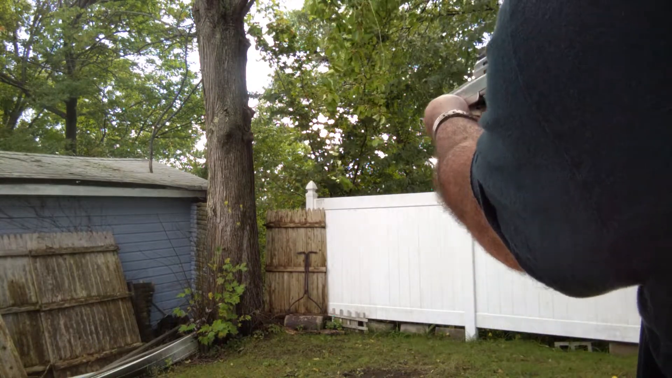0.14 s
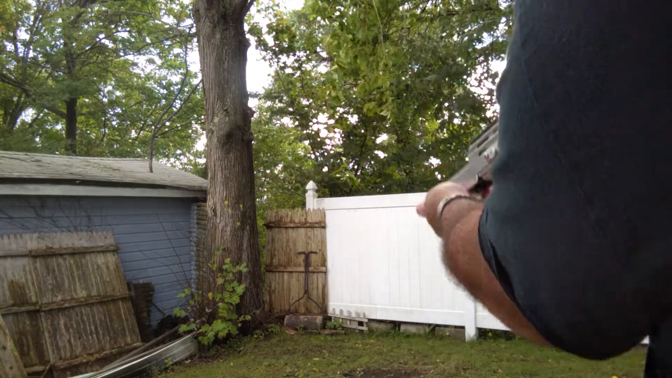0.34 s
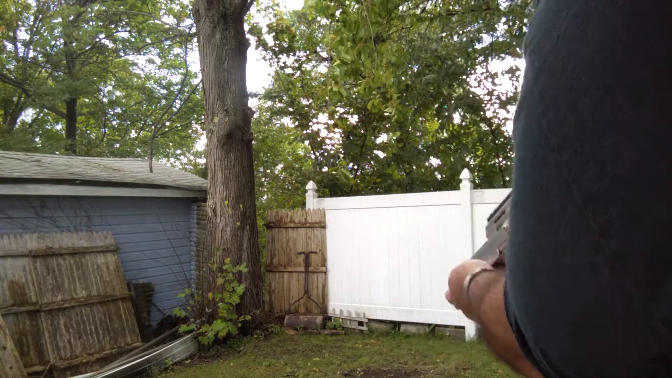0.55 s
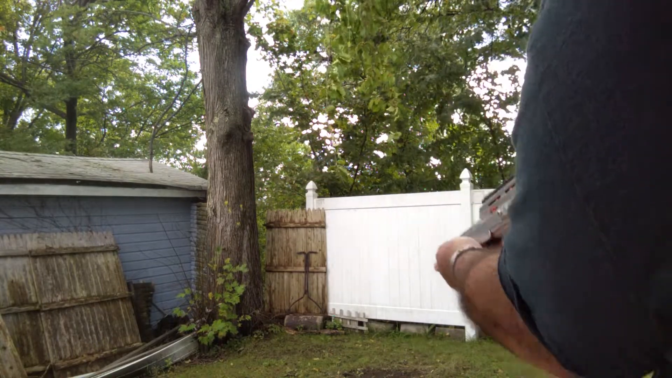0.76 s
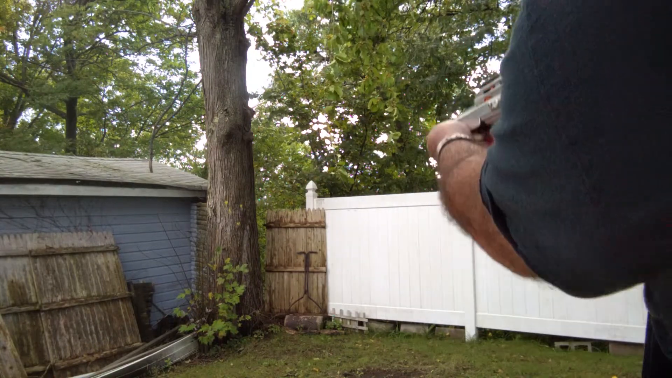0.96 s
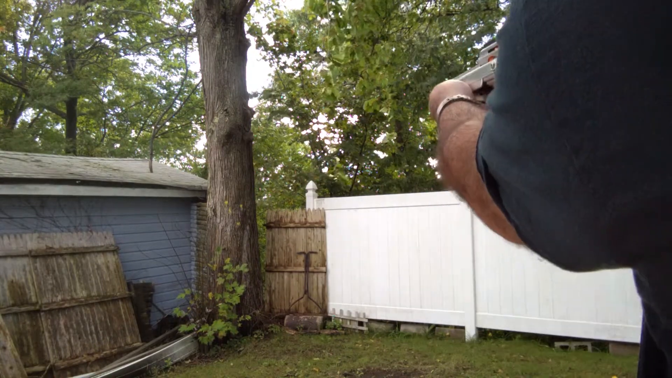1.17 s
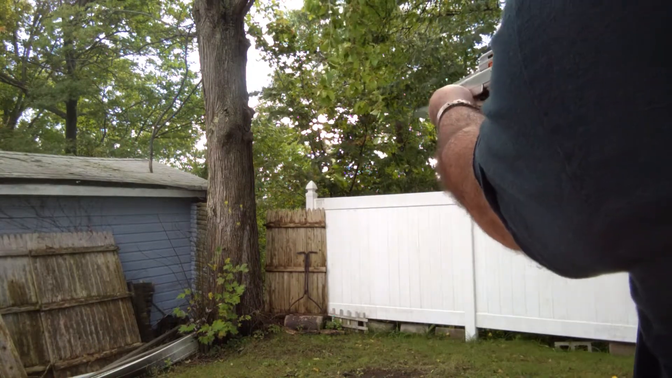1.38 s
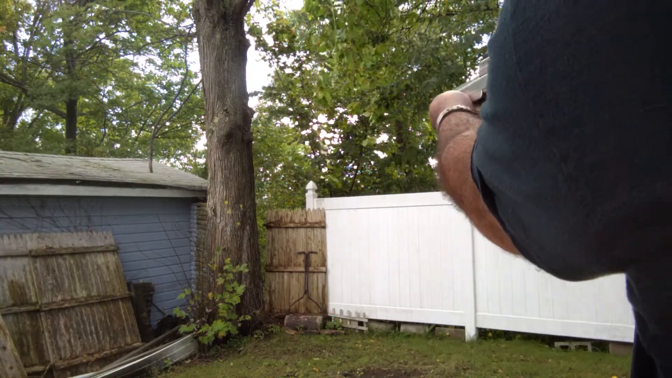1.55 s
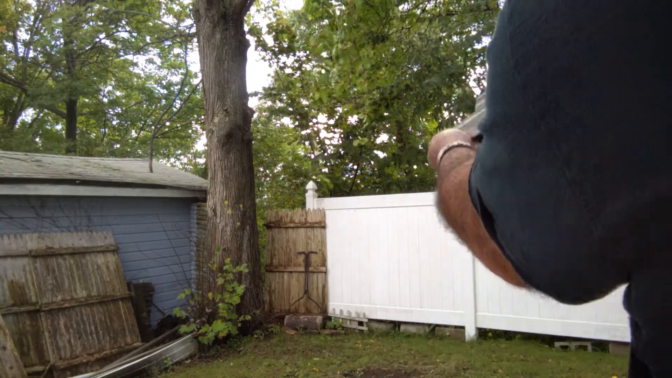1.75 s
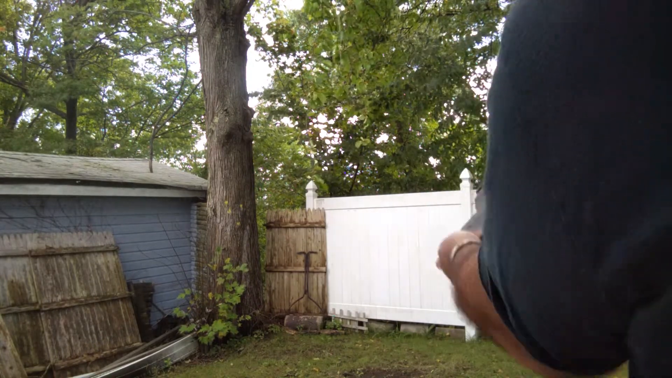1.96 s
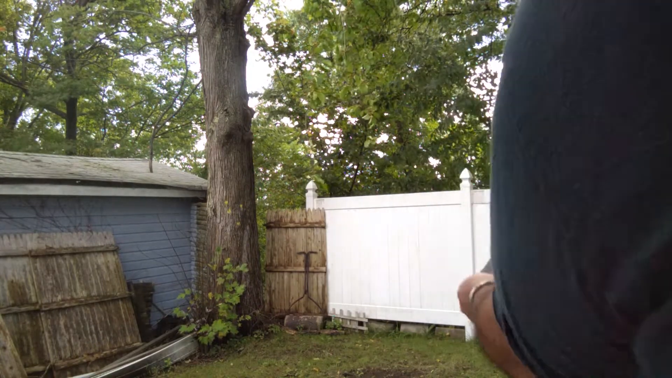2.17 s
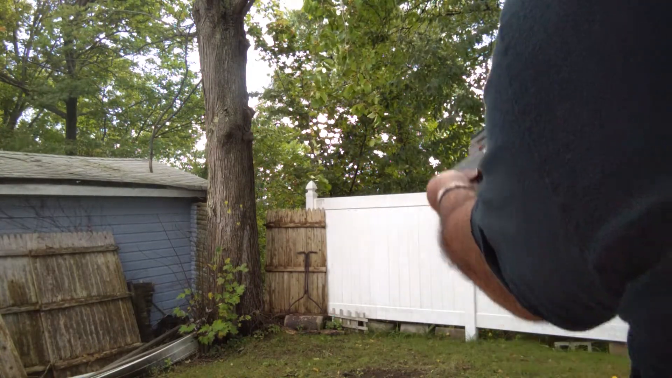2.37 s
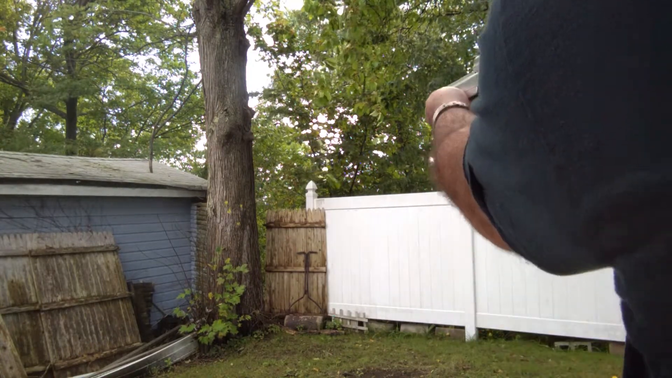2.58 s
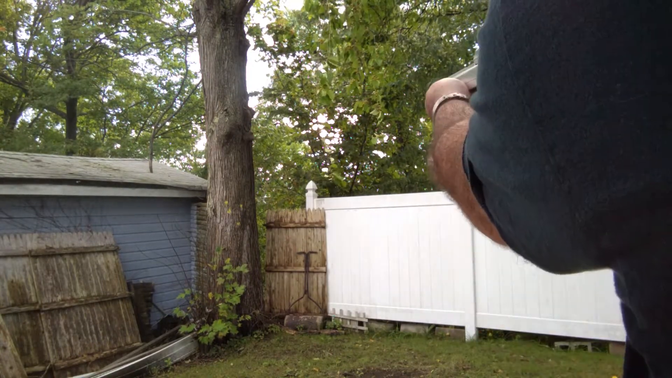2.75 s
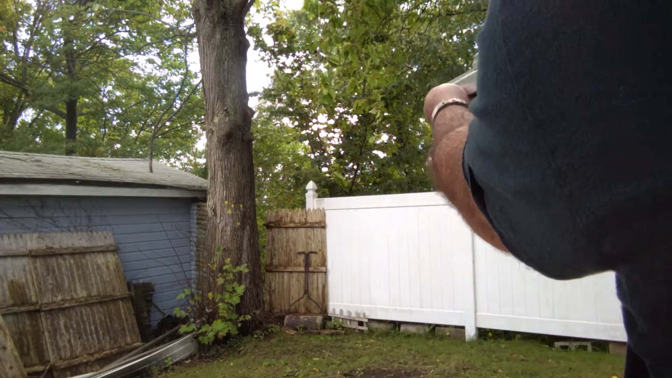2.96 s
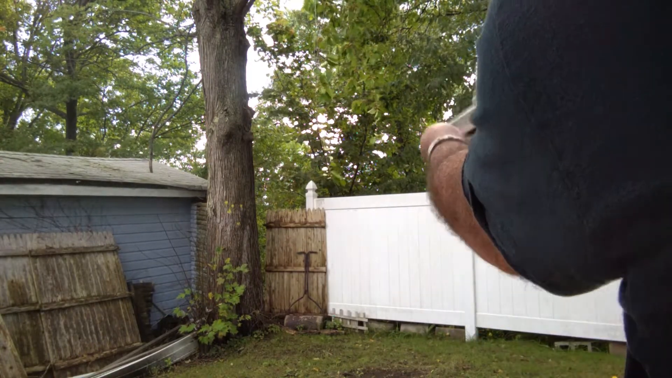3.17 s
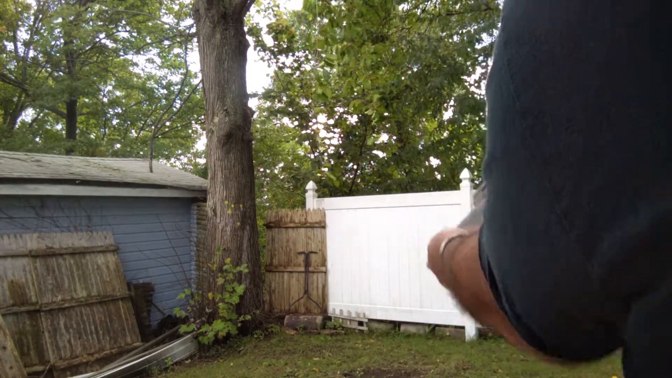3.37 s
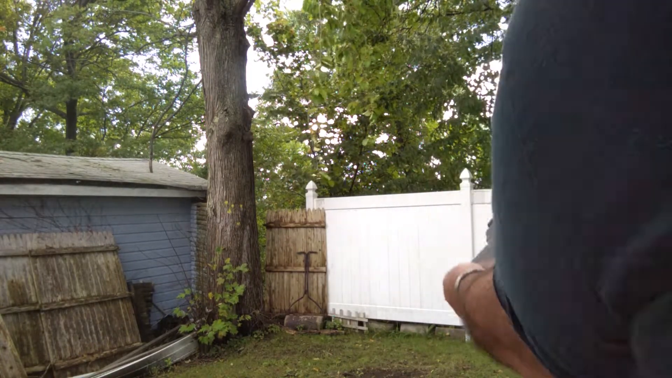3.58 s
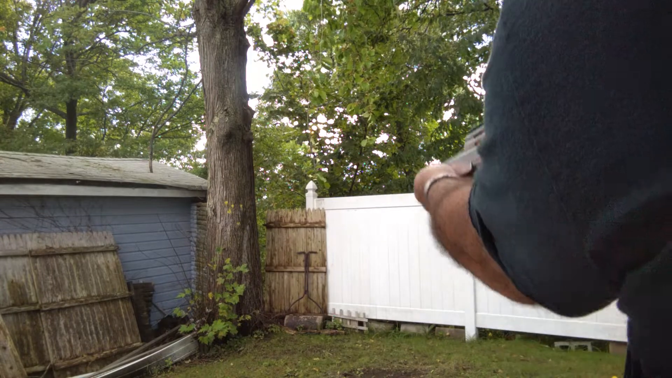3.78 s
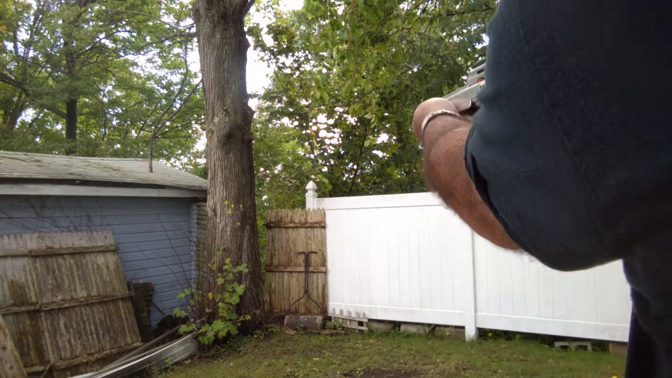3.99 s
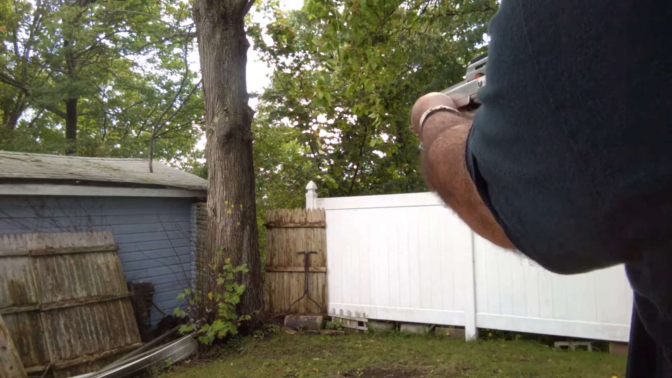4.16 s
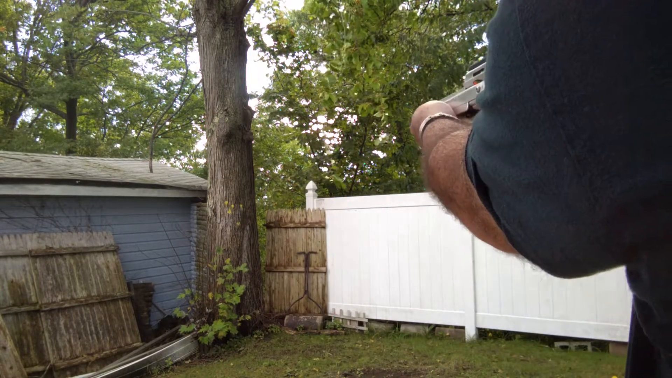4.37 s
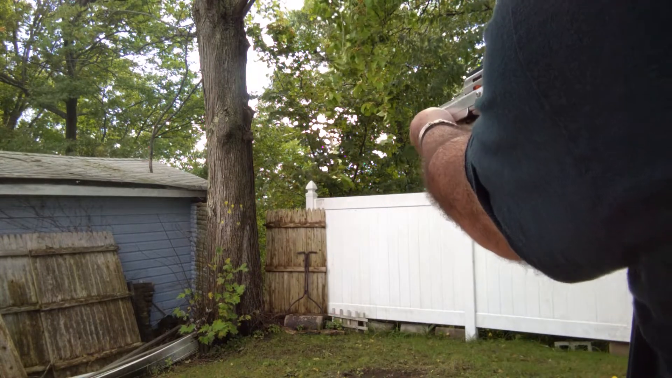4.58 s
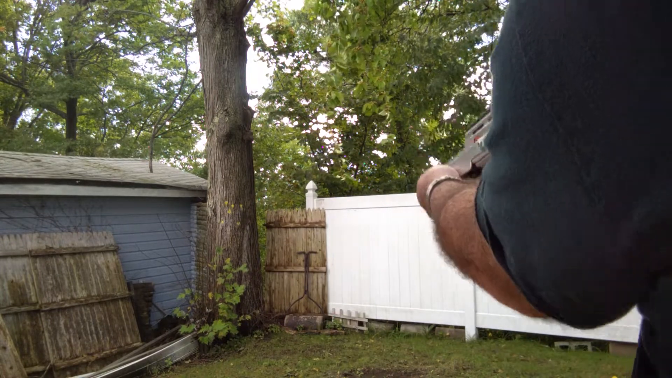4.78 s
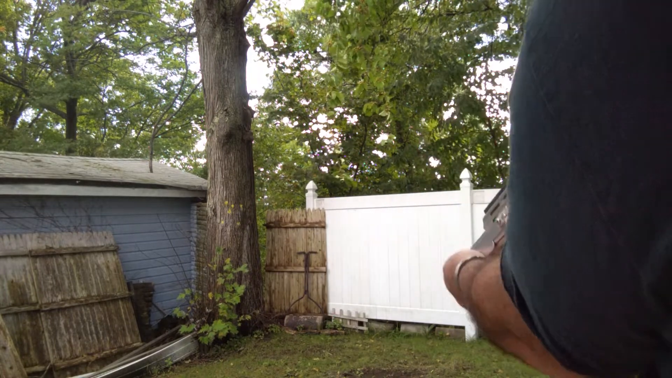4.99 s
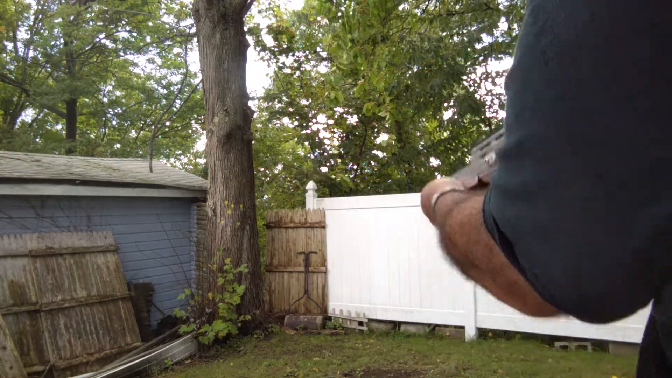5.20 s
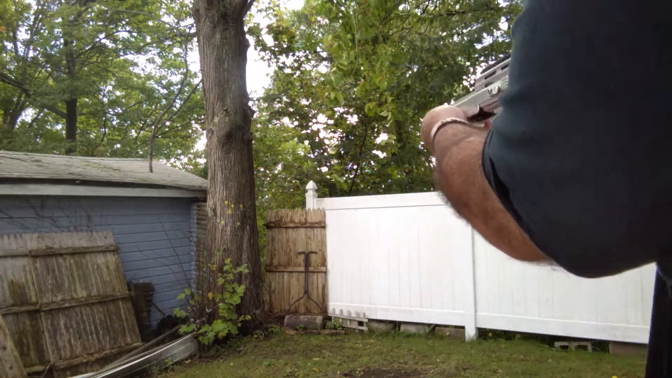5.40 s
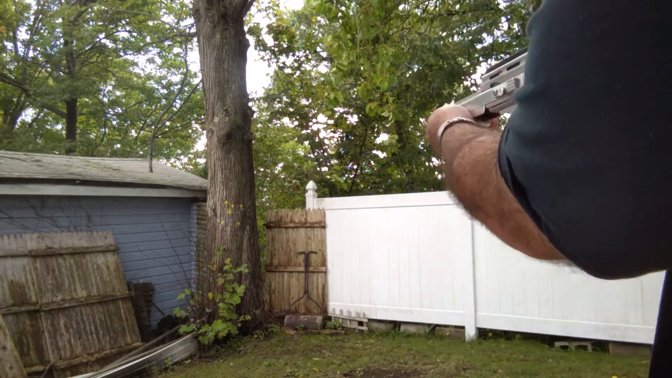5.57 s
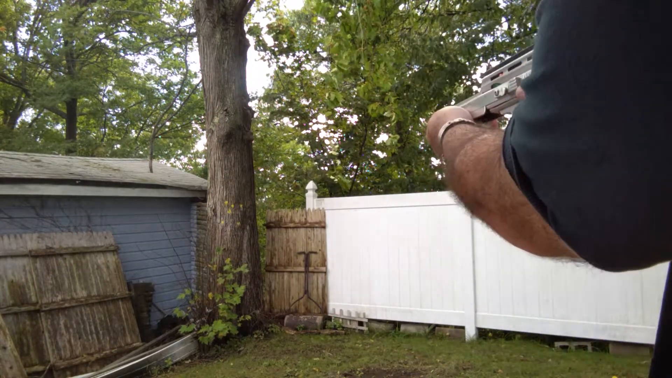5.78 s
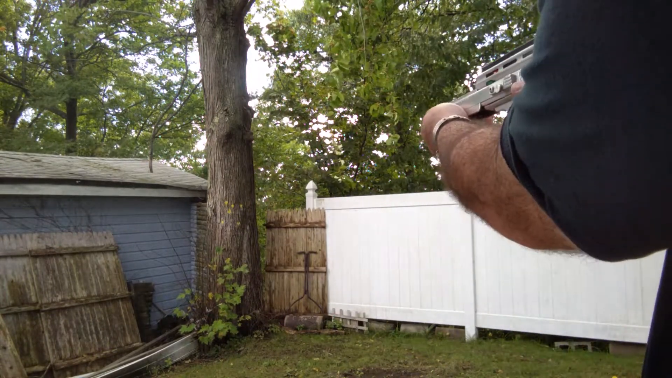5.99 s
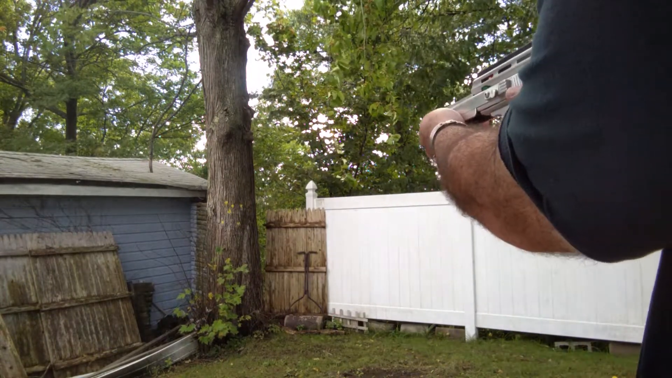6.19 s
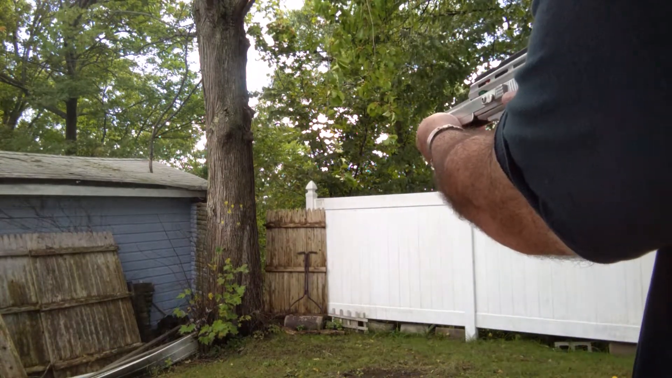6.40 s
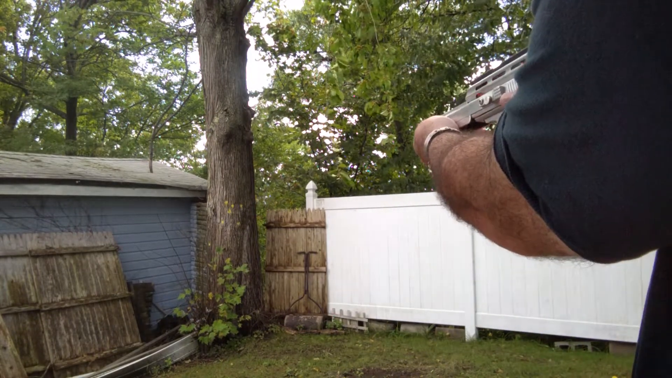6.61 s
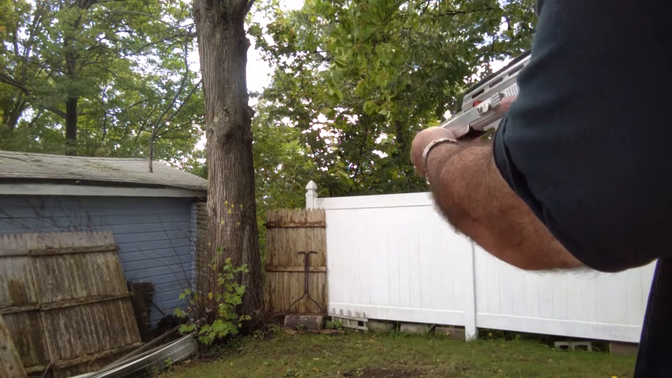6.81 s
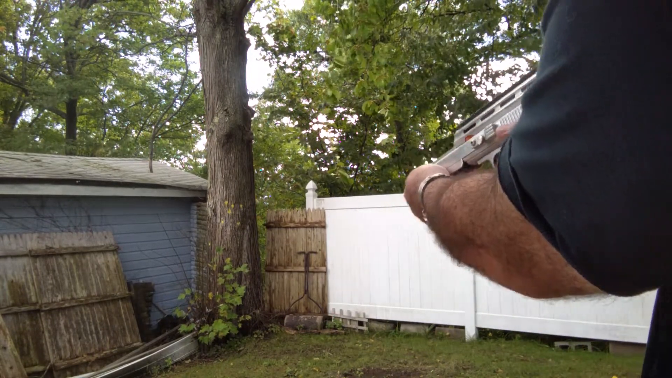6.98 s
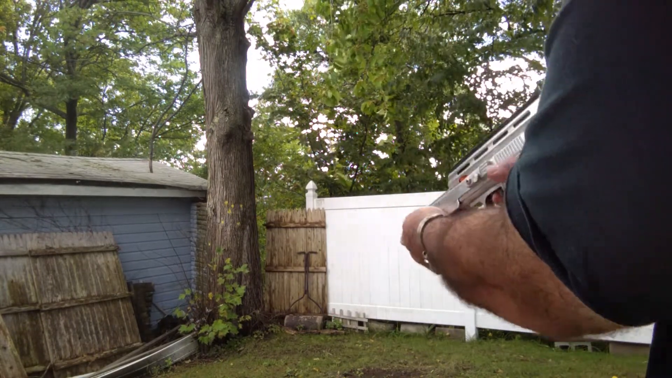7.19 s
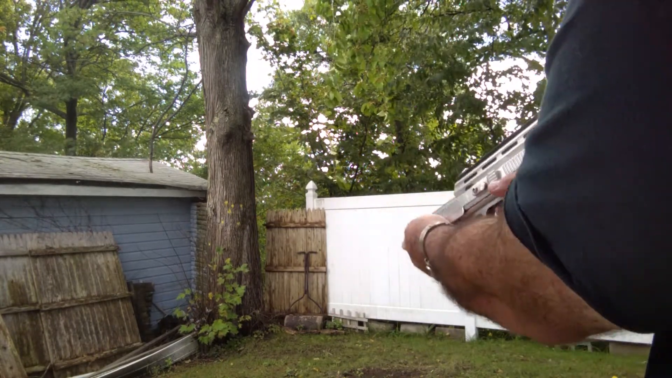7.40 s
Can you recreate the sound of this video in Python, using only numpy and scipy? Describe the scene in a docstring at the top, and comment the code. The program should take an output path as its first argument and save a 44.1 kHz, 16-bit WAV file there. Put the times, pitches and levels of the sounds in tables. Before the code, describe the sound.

A gas paintball pistol cracks four separate shots close by outdoors, slide clicking back and forth between them, with one brief low wind gust.

```python
"""A gas paintball pistol fires four shots close by in a fenced yard, after the dying echo of an earlier one.
Each shot is a hammer run, modal clatter at the valve and a blast of overpressure and suction; the ball lands.
The slide is recocked after each shot by filtered noise clicks, ringing frame modes and stick-slip scraping.
Far engines hum as sums of partials; traffic, leaves and one gust on the microphone are coloured noise.
Echoes and scatter answer from the yard, and gain control pulls the sound down after each shot."""
import sys
import numpy as np
from scipy import signal
from scipy.fft import rfft, irfft
from scipy.io import wavfile
from scipy.ndimage import uniform_filter1d

SR = 44100
rng = np.random.default_rng(int(sys.argv[2]) if len(sys.argv) > 2 else 0)


def pcm_store(signal):
    """Save signal as 16-bit PCM."""
    levels = np.round(np.clip(np.atleast_2d(signal), -1, 1) * 32767)
    wavfile.write(sys.argv[1], SR, levels.astype(np.int16).T)


N = 328545
T = np.arange(N) / SR

# Shots; the first falls before the start, so only its echo is left.
# Each row: muzzle blast in seconds, level in dB, hammer run in seconds, flight of the ball in seconds,
# relative impact level in dB.
SHOTS = [(-.135, -6.5, 0.0076, 0.15, -40.5), (1.392, 0, 0.0096, 0.11, -23),
         (2.8531, 0.5, 0.0079, 0.11, -24), (4.409, 0.5, 0.0084, .1163, -27.5),
         (6.4281, 0, 0.0098, 0.12, -26.5)]
# Colour of a metal contact. Each row: frequency in Hz, gain in dB.
SNAP = [(200, -6.5), (900, 3), (2200, 7.5), (3800, 0.5), (5200, -4), (7200, -3.5), (9000, -9.5),
        (11000, -19), (14000, -11.5), (17000, -23)]
# Colour of the hammer's blow. Each row: frequency in Hz, gain in dB.
BLOW = [(80, -4.5), (330, 4), (550, 3), (800, 3), (1100, -1), (1500, 1.5), (2000, 2.5), (3000, -8),
        (4200, -10), (5200, -16.5), (7500, -15.5), (10000, -27.5), (15000, -43)]


def undb(db):
    """Decibels to amplitude gain: 20 dB is a factor of ten."""
    return 10 ** (np.asarray(db) / 20)


def add(out, x, s):
    """Superposition: mix x into out from time s in seconds, cut at both ends."""
    i = int(round(s * SR))
    a, b = max(i, 0), min(i + len(x), len(out))
    if b > a:
        out[a:b] += x[a - i:b - i]


def colour(x, points):
    """Minimum-phase filter through (Hz, dB) points, made causal by folding the cepstrum."""
    hz, db = np.transpose(points)
    size = 4096
    f = np.maximum(np.arange(size // 2 + 1) * SR / size, 1)
    gain_db = np.interp(np.log(f), np.log(hz), db)
    cepstrum = irfft(np.log(undb(gain_db)))
    cepstrum[1:size // 2] *= 2
    cepstrum[size // 2 + 1:] = 0
    response = irfft(np.exp(rfft(cepstrum)))
    return signal.fftconvolve(x, response)[:len(x)]


def fade(t, t60):
    """Exponential decay of a damped system: 60 dB down after t60 seconds."""
    return np.exp(-np.log(1000) * t / t60)


def unit(x):
    """Normalise the mean power: scale to rms 1."""
    return x / np.sqrt(np.mean(x ** 2))


def walk(rate):
    """Low-passed noise: a slow random drift of rms 1, with about rate new values a second."""
    k = int(SR / rate)
    steps = np.repeat(rng.standard_normal(N // k + 1), k)
    smooth = uniform_filter1d(uniform_filter1d(steps, k), k)
    return unit(smooth[:N])


def burst(t, t60):
    """Exponentially decaying noise of unit energy."""
    x = rng.standard_normal(len(t)) * fade(t, t60)
    return x / np.sqrt(np.sum(x ** 2))


def curve(rows):
    """Linear interpolation in time: each column of (s, ..) rows, joined by straight lines."""
    s, *columns = np.transpose(rows)
    return [np.interp(T, s, column) for column in columns]


def engines():
    """Periodic combustion: partials of each far engine's rotation, wavering in level and pitch."""
    # A far four-stroke engine, perhaps a mower. Each row: time in seconds, shaft speed in Hz,
    # levels of the low partials, drone and upper partials in dB.
    mower_course = [(0, 31.4, -64, -59, -67), (.9, 31.3, -56.5, -53.5, -63), (1.7, 31.3, -58, -68.5, -69),
                    (2.6, 31.15, -60.5, -68.5, -56), (3.4, 31, -65.5, -56.5, -57),
                    (4.1, 31, -66.5, -50, -56), (5, 30.85, -66.5, -48, -63.5), (6.2, 30.8, -68, -51.5, -60),
                    (6.8, 30.7, -69.5, -58, -70.5), (7.45, 30.7, -68.5, -58, -67)]
    # Its three groups of partials. Each row: multiple of the shaft speed, relative level in dB.
    low = [(3, -0.5), (5, -1)]
    drone = [(6, 0.58)]
    upper = [(8, -9), (8.5, -11.5), (9, 1), (9.5, -8), (10, -5), (10.5, -11), (11.5, -12)]
    # A far vehicle cruises, eases off, then gathers speed.
    # Each row: time in seconds, firing rate in Hz, level in dB.
    vehicle_course = [(0, 40.5, -56), (.8, 39.41, -51.5), (1.25, 41.1, -54), (1.7, 41.46, -67.5),
                      (3.3, 41.3, -64), (4.2, 42.07, -55), (4.9, 44.33, -54.5), (5.6, 44.77, -58),
                      (6.35, 45.6, -46.5), (6.65, 48.84, -53), (7.45, 49.5, -52)]
    # Exhaust colour, through which the partials glide. Each row: frequency in Hz, gain in dB.
    exhaust = [(42, -7.5), (82, -4.5), (98, 0), (122, -5), (136, 0.5), (148, -2.5), (159, 3.5), (172, -6),
               (200, -8.5), (220, -2.5), (250, -17)]

    def turning(hz, waver):
        wavering_hz = hz * (1 + waver * walk(10.0))
        return 2 * np.pi * np.cumsum(wavering_hz) / SR

    def partial(phase, db):
        level = undb(db + 0.76 * walk(4.6))
        return level * np.sqrt(2) * np.sin(phase + 2 * np.pi * rng.random())

    out = np.zeros(N)
    shaft_hz, *levels = curve(mower_course)
    phase = turning(shaft_hz, waver=0.0014)
    for level, group in zip(levels, (low, drone, upper)):
        for k, db in group:
            out += partial(k * phase, level + db)

    firing_hz, level = curve(vehicle_course)
    phase = turning(firing_hz, waver=.006)
    for k in range(1, 6):
        exhaust_db = np.interp(k * firing_hz, *np.transpose(exhaust))
        out += partial(k * phase, level + exhaust_db)
    return out


def bed(hue):
    """Stationary noise of rms 1, shaped by a colour."""
    return unit(colour(rng.standard_normal(N), hue))


def traffic():
    """Many far sources add up to noise: a low rumble that swells as cars pass."""
    # Colour of the distant traffic. Each row: frequency in Hz, gain in dB.
    traffic_hue = [(20, -5.5), (45, -3.5), (90, 1.5), (190, 2.5), (260, -3), (400, -1), (600, -9.5),
                   (1000, -16.5), (1500, -23), (2500, -38), (5000, -60)]
    # Passing cars. Each row: time when nearest in seconds, half length in seconds, rise of the rumble in dB.
    passes = [(.8, 0.3, 6.5), (2.8, .5, 1.5), (4.85, 0.62, 5.5)]
    swell_db = sum(db * np.exp(-((T - s) / half_s) ** 2) for s, half_s, db in passes)
    return bed(traffic_hue) * undb(-54.5 + swell_db + 0.3 * walk(13))


def leaves():
    """Countless small rustles merge into a faint, slowly drifting hiss."""
    # Colour of the leaves. Each row: frequency in Hz, gain in dB.
    leaves_hue = [(100, -1), (1400, 5), (2500, 0), (4000, -8), (7000, -13.5), (11000, -21.5), (15500, -26)]
    return bed(leaves_hue) * undb(-71 + 0.59 * walk(0.33))


def wind_gust():
    """Turbulence on the microphone: low fluttering noise rises at once, sags and dies, with fine crackle."""
    # Colour of the gust. Each row: frequency in Hz, gain in dB.
    gust_hue = [(20, -4.5), (60, 6), (110, 5.5), (220, 10), (320, 6), (500, -0.5), (700, -9), (1200, -15.5),
                (1600, -28.5), (3000, -36), (6000, -54), (15000, -52.5)]
    start_s, attack_s, hold_s, release_t60 = 5.738, .012, 0.72, 0.18
    gust_db, sag_db_per_s = -38.5, 11.5
    grit_db, grit_per_s, patchy_db = -77.5, 900, 3.5  # rms of the crackle before its envelope

    age = np.maximum(T - start_s, 0)
    rise = np.minimum(age / attack_s, 1)
    blowing = rise * fade(np.maximum(age - hold_s, 0), release_t60)
    struck = rng.random(N) < grit_per_s / SR
    grains = rng.standard_normal(N) * struck * undb(patchy_db * walk(160))
    grit = undb(grit_db) * unit(colour(grains, [(2000, -2.5), (7000, 0), (15000, 0)]))
    gust = bed(gust_hue) * undb(gust_db - sag_db_per_s * age + 1.0 * walk(42))
    return blowing * (gust + grit)


def yard(x, near_db, far_db):
    """Reflection and scattering: direct sound, echoes, near scatter and a wash whose treble dies first."""
    # Echoes from the ground and nearby fences. Each row: delay in seconds, level in dB.
    echoes = [(.0064, -16), (.0098, -28)]
    # Scatter from nearby things. Each row: frequency in Hz, gain in dB.
    near_hue = [(50, -30), (130, -18), (240, -15), (350, -4.5), (600, -6), (1200, -5), (2500, -7),
                (6000, -9.5), (14000, -8)]
    # Later wash from trees and buildings. Each row: frequency in Hz, gain in dB.
    far_hue = [(50, -28.5), (130, -21), (350, -16), (700, -15), (1400, -6.5), (2200, -8), (3500, -1.5),
               (7000, 1.5), (10000, 0.5), (15000, 2.5)]

    t = T[:SR * 2 // 3]
    response = 1. * (t == 0)
    for s, db in echoes:
        add(response, undb([db]), s)
    add(response, undb(near_db) * colour(burst(t, t60=0.14), near_hue), .004)
    low_wash = colour(burst(t, t60=0.49), [(3500, -2), (9000, -14.5)])
    high_wash = colour(burst(t, t60=0.34), [(2500, -10.5), (7000, -3.5)])
    uneven = undb(1.2 * walk(160)[:len(t)])
    add(response, undb(far_db) * colour((low_wash + high_wash) * uneven, far_hue), .012)
    return signal.fftconvolve(x, response)[SR:SR + N]  # drop the early second


def frame_ring(t):
    """Modal vibration: each blow shares its force among the frame's damped modes a little differently."""
    # Nominal modes. Each row: frequency in Hz, level in dB, 60 dB decay time in seconds.
    modes = [(780, -1, 0.0075), (960, -4, .025), (1360, -5, 0.036), (1380, -0.5, 0.045), (2000, 0, 0.012),
             (2240, -1, 0.016), (2750, -6, 0.0099), (3220, -12.5, .018), (3880, -9.5, 0.018),
             (4851, -8.5, 0.012)]
    out = np.zeros(len(t))
    for hz, db, t60 in modes:
        level = undb(db + 2 * rng.standard_normal()) * rng.choice([-1, 1])
        mode_hz = hz * (1 + 0.036 * rng.standard_normal())
        out += level * np.sin(2 * np.pi * mode_hz * t) * fade(t, t60)
    return out / np.sqrt(len(modes))


def click(snap_db, ring_db):
    """Impact excitation: a hard contact snaps, loose parts chatter for a moment, and the frame rings."""
    t = T[:SR // 12]
    uneven_db = 3.8 * np.repeat(rng.standard_normal(len(t)), SR // 1000)[:len(t)]  # steps of about 1 ms
    chatter = burst(t, t60=0.042) * undb(uneven_db)
    contact = burst(t, t60=0.013) * (1 - fade(t, t60=0.0019))
    snap = colour(contact + undb(-6.5) * chatter, SNAP)
    return undb(snap_db) * (undb(22) * snap + undb(ring_db - 2.5) * frame_ring(t))


def small_ticks():
    """Small impacts: loose parts of the handled pistol, and at 3.131 s probably debris of the burst ball."""
    # Single ticks. Each row: time in seconds, relative snap level in dB.
    ticks = [(.940, -56), (2.624, -61.5), (3.131, -48.5)]
    ring_db, faint_db = -8.5, -66.5
    out = np.zeros(N + SR)  # begins one second early
    for s, db in ticks:
        add(out, click(db, ring_db), 1 + s)
    for s in rng.uniform(0, N / SR, size=10):
        add(out, click(faint_db + 2 * rng.standard_normal(), ring_db), 1 + s)
    return out


def scrape(length_s, db):
    """Stick-slip friction: the slide slips in random jerks along the frame for one stroke."""
    # Colour of the scraping slide. Each row: frequency in Hz, gain in dB.
    scrape_hue = [(300, -19), (1000, -10.5), (1200, -8), (1280, 9), (1360, -13), (1460, 6.5), (1650, -7),
                  (2300, -16), (4000, -40), (12000, -46.5)]
    slips_per_s = 1500
    t = T[:SR // 2]
    slips = rng.standard_normal(len(t)) * (rng.random(len(t)) < slips_per_s / SR)
    stroke = np.sqrt(np.abs(np.sin(np.pi * np.clip(t / length_s, 0, 1))))
    return undb(db) * unit(colour(slips, scrape_hue)) * stroke


def cocking():
    """Impact and friction: the slide is drawn over catches to the stop, rubs forward and latches with a rebound."""
    # Draws back. Each row: arrival at the rear stop in seconds, length of the draw in seconds,
    # relative snap level in dB, relative frame ring in dB.
    pulls = [(.5545, 0.075, -44, 16.5), (2.0696, .060, -34, 9.5), (3.4448, 0.052, -35.5, 6),
             (4.891, 0.094, -38, 3), (7.241, 0.072, -38.5, 7)]
    # Catches passed in every draw. Each row: share of the draw still to go, relative snap level in dB,
    # relative frame ring in dB.
    catches = [(1, -53.5, -7), (0.8, -55, 9), (0.33, -53.5, -13), (.23, -57, -12)]
    # Pushes home. Each row: latching in seconds, relative snap level in dB, relative frame ring in dB,
    # length of the last shove in seconds, its scrape level in dB.
    pushes = [(0.7837, -39, 3, .027, -53), (2.303, -34.5, 0, .022, -44), (3.699, -39.5, 7.5, 0.028, -47.5),
              (5.18, -37, 0, 0.02, -57.5), (7.379, -41.5, -11, .02, -67)]
    # Contacts at the rear stop. Each row: seconds after the main one, relative level in dB.
    stop_contacts = [(-.002, -6), (0, 1)]
    # Contacts at the front latch. Each row: seconds after the main one, relative level in dB.
    latch_contacts = [(0, -0.5), (.0045, -7), (.011, -7.5)]
    feed_lead_s, feed_db, feed_ring_db = .107, -51, 8  # a tick, likely the next ball feeding
    rub_db = -67
    knock_db, knock_ring_db = -8, 14  # dull knock that starts the last shove; snap relative to its scrape

    out = np.zeros(N + SR)  # begins one second early
    for s, draw_s, snap_db, ring_db in pulls:
        for to_go, catch_db, catch_ring_db in catches:
            add(out, click(catch_db, catch_ring_db), 1 + s - to_go * draw_s)
        for after_s, db in stop_contacts:
            add(out, click(snap_db + db, ring_db), 1 + s + after_s)
    for (back_s, *_), (s, snap_db, ring_db, shove_s, shove_db) in zip(pulls, pushes):
        add(out, scrape(s - back_s, rub_db), 1 + back_s)  # light rub all the way
        if s - back_s > 1.5 * feed_lead_s:  # a hurried stroke runs through without the tick
            add(out, click(feed_db, feed_ring_db), 1 + s - feed_lead_s)
        add(out, click(shove_db + knock_db, knock_ring_db), 1 + s - shove_s)
        add(out, scrape(shove_s, shove_db), 1 + s - shove_s)
        for after_s, db in latch_contacts:
            add(out, click(snap_db + db, ring_db), 1 + s + after_s)
    return out


def action(run_s):
    """Impact and recoil: hammer run, clatter from run_s on, valve puff and thump of the hollow body."""
    # Nominal blows of hammer and bolt. Each row: seconds after the first, level in dB.
    blows = [(0, -8.5), (.0012, 4), (.0027, -5), (.0035, -5)]
    t = T[:SR // 8]
    sliding = colour(rng.standard_normal(len(t)), SNAP) * (t < run_s)
    out = undb(-30) * sliding * (1 - fade(t, t60=0.07))
    for s, db in blows:
        contact = colour(undb(-6.5) * burst(t, t60=0.016) - (t == 0), BLOW)
        blow = undb(16) * contact + undb(-20.5) * frame_ring(t)
        jitter_s = 0.00011 * rng.standard_normal()
        add(out, undb(db + rng.standard_normal()) * blow, run_s + s + jitter_s)
    puff = np.sin(np.pi * np.clip(t / 0.0016, 0, 1)) ** 2
    add(out, undb(-1.5) * puff, run_s + 0.0012)
    thump = -np.sin(2 * np.pi * 205 * t) * fade(t, t60=0.03)
    add(out, undb(-7.5) * thump, run_s + .0045)  # recoil rocks the hollow body
    return out


def muzzle_blast(t, push_s, pull_s, push_db, pull_db, edge_hz):
    """Blast wave: gas behind the ball gives a steep overpressure, then a longer suction."""
    push = np.sqrt(np.clip(1 - t / push_s, 0, 1))
    pull = np.sin(np.pi * np.clip((t - push_s) / pull_s, 0, 1))
    soften = signal.butter(2, edge_hz, fs=SR, output="sos")
    return signal.sosfilt(soften, undb(push_db) * push - undb(pull_db) * pull)


def report():
    """Sudden release: the ball clears the bore with a crack, the gas follows, and the body booms."""
    t = T[:SR // 8]
    crack = colour(-1. * (t == 0), BLOW)
    boom = np.sin(2 * np.pi * 335 * t) * fade(t, t60=0.039)
    out = undb(7.5) * crack + undb(-6.0) * boom
    blast = muzzle_blast(t, push_s=.0013, pull_s=.003, push_db=10.0, pull_db=9.0, edge_hz=2600)
    add(out, blast, .00012)
    return out


def landing():
    """Inelastic impact: the ball splats as a short noise burst, and the target rattles just after."""
    t = T[:SR // 8]
    splat = colour(burst(t, t60=0.01), SNAP)
    add(splat, undb(-2.0) * colour(burst(t, t60=0.03), SNAP), .005)
    return splat


def firing():
    """Superposed transients: every shot as (mechanism with the ball's landing, muzzle report)."""
    barrel_s = .0146  # from the hammer's blow until the ball leaves the muzzle
    parts, muzzle = np.zeros((2, N + SR))  # begin one second early
    for s, db, run_s, flight_s, hit_db in SHOTS:
        add(parts, undb(db) * action(run_s), 1 + s - barrel_s - run_s)
        add(muzzle, undb(db) * report(), 1 + s)
        add(parts, undb(hit_db + 16.5) * landing(), 1 + s + flight_s)
    return parts, muzzle


def scene():
    """Linear superposition: the muzzle excites the yard most, while the handled slide stays drier."""
    parts, muzzle = firing()
    pistol = yard(muzzle, near_db=-3.5, far_db=-4.5)
    pistol += yard(parts, near_db=-4.5, far_db=-5)
    pistol += yard(cocking() + small_ticks(), near_db=-6, far_db=-14.5)
    background = engines() + traffic() + leaves() + wind_gust()
    return (pistol + background)[None]


def slow_swing():
    """High-pass response: after each shot the recorder's low-cut filter leaves a slow swing, far below hearing."""
    swing = np.sin(2 * np.pi * 1.0 * T) * fade(T, t60=0.89)
    sag = fade(T, t60=.15)
    out = np.zeros(N)
    for s, *_ in SHOTS:
        add(out, undb(-27) * (swing - sag), s + 0.0043)
    return out


def gain_control(x, threshold_db, depth_db, recover_db_s, attack_s):
    """Dynamic compression: a loud peak soon turns the gain down; it creeps back at a steady rate."""
    level_db = 20 * np.log10(np.abs(x) + 1e-9)
    over = np.clip(level_db - threshold_db, 0, depth_db)
    recovery = recover_db_s * T
    held = np.maximum.accumulate(over + recovery, axis=-1) - recovery
    pole = np.exp(-1 / (attack_s * SR))
    return x * undb(-signal.lfilter([1 - pole], [1, -pole], held))


def record(dry):
    """Compression and saturation: gain control, faint hiss, overload, soft treble and a steep top cut."""
    x = gain_control(dry, threshold_db=-13.5, depth_db=11.5, recover_db_s=8.5, attack_s=0.012)
    hiss_hue = [(2000, 4.5), (7000, 0), (11000, -1.5), (15000, 2.5)]  # Hz, dB
    hiss = undb(-84.0) * colour(rng.standard_normal(N), hiss_hue)
    x = x + hiss + slow_swing()
    x = .97 * x / (1 + x ** 6) ** (1 / 6)  # saturates near full scale
    x = signal.sosfilt(signal.butter(2, 12000, fs=SR, output="sos"), x)
    return signal.sosfilt(signal.ellip(12, .1, 70, 15700, fs=SR, output="sos"), x)


dry = scene()
out = record(dry)
pcm_store(out)
```